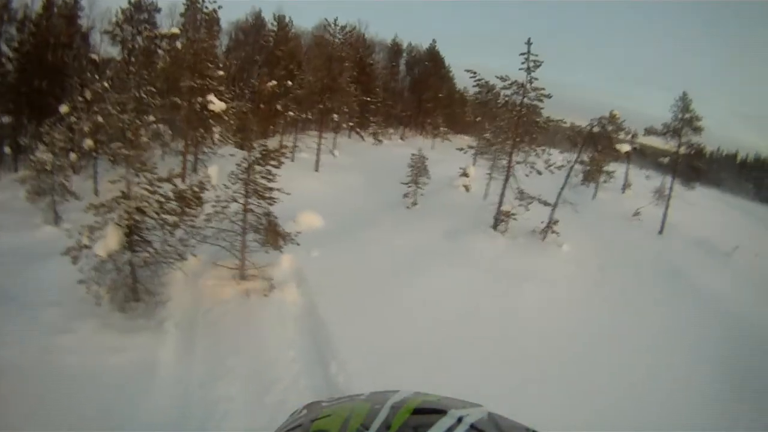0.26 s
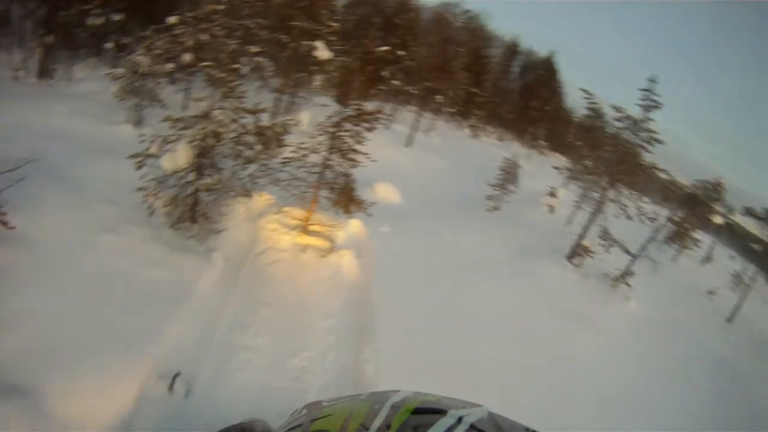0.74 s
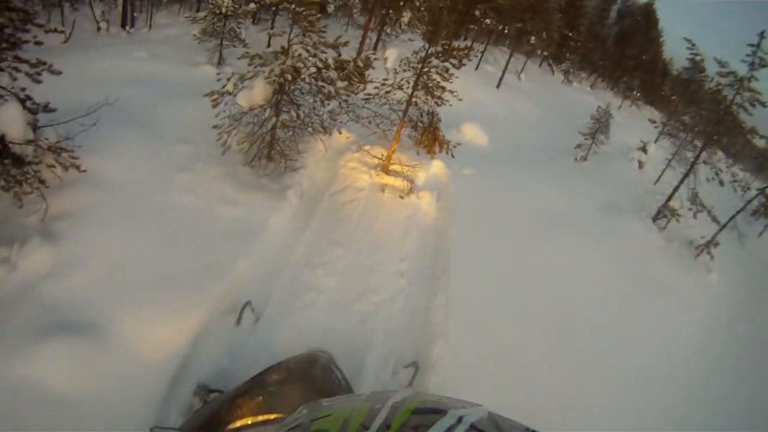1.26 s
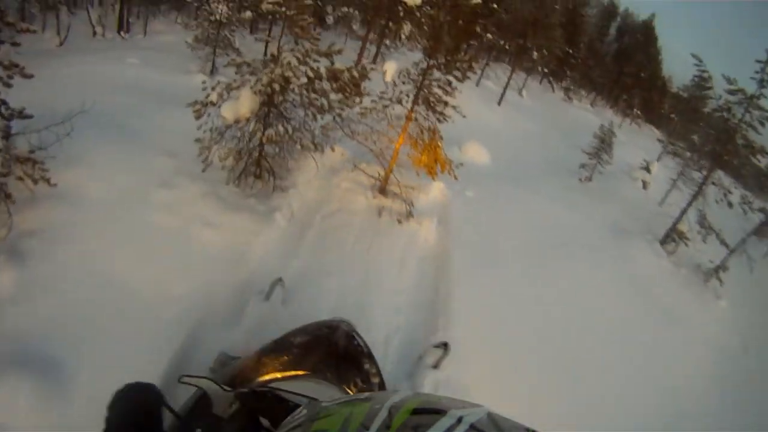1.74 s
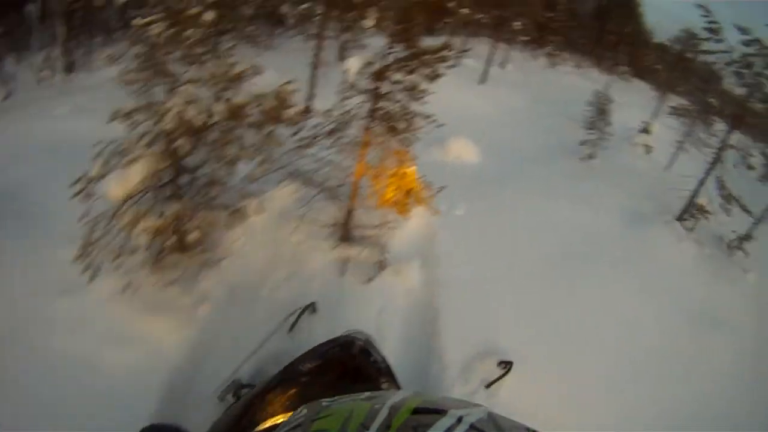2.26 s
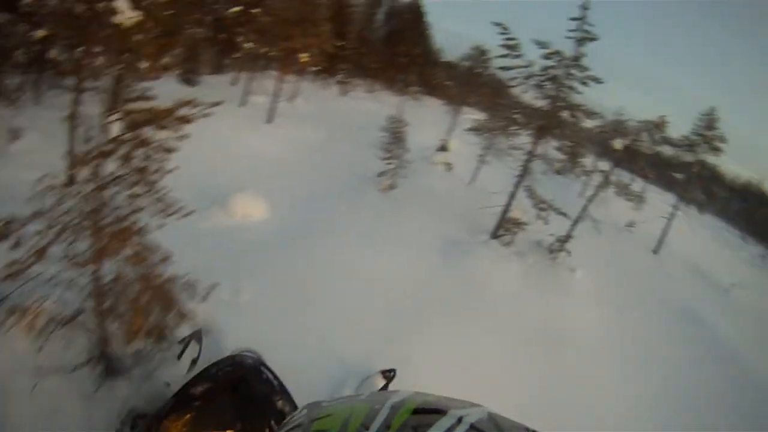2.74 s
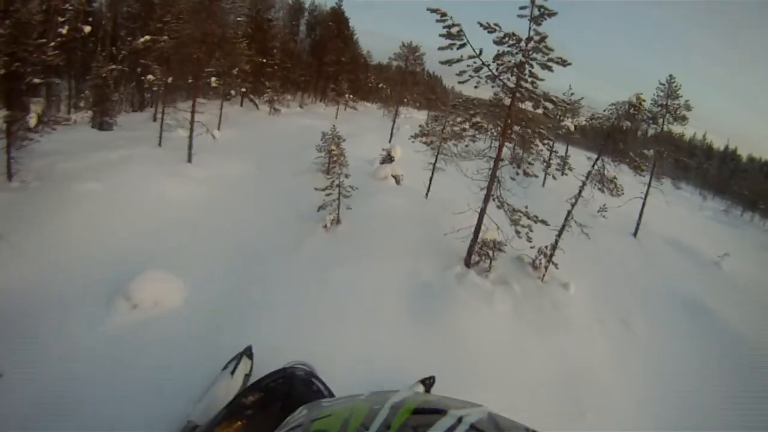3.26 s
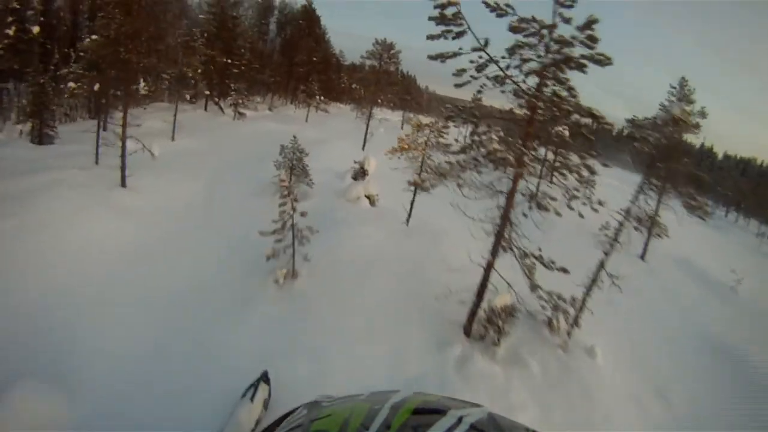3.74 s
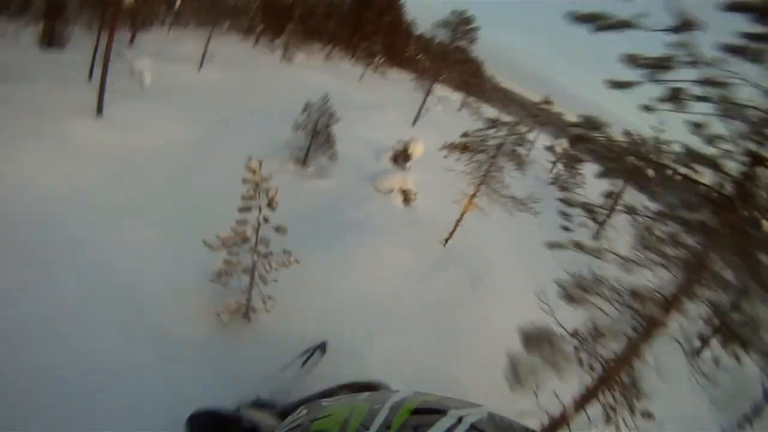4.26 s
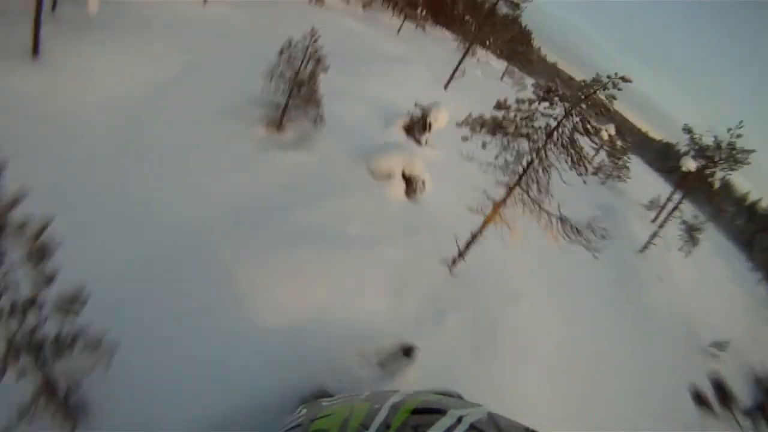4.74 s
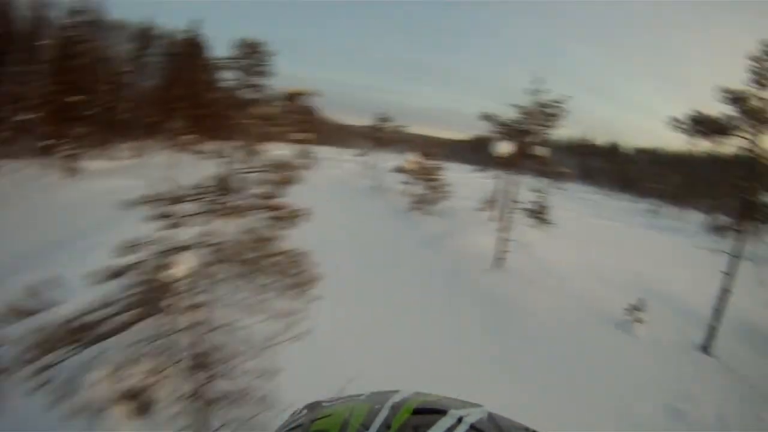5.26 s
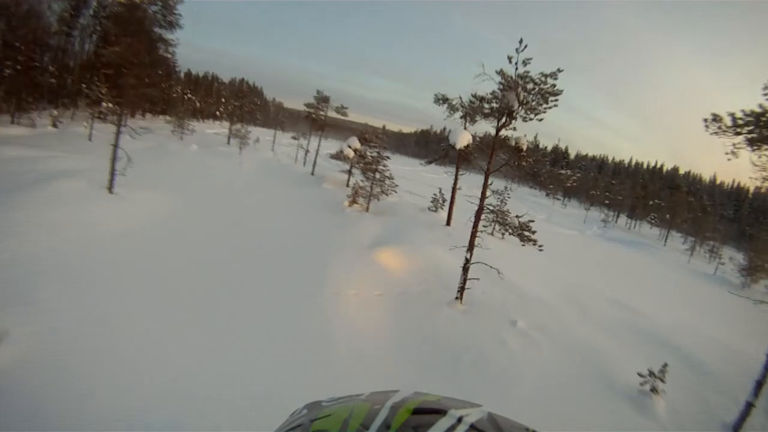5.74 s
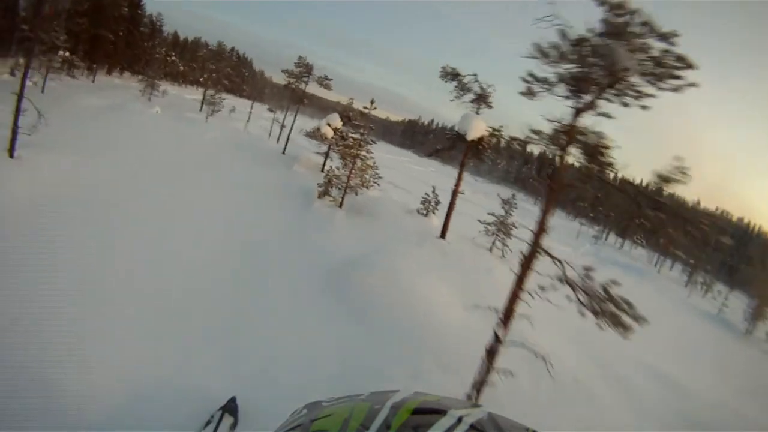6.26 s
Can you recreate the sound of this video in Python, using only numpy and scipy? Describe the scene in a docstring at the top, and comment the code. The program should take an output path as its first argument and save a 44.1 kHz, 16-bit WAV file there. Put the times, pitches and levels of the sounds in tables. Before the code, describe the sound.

A two-stroke snowmobile is heard close up from the rider's helmet, outdoors in deep snow. It begins with a low, quiet drone and a faint rattle of loose parts. Around 1 second it revs up into a clattering buzz, and a twig ticks against it. After a small dip near 2 seconds it climbs again, with a brief metallic buzz, reaching its highest, snarling whine from about 2.7 to 3.8 seconds while the track hums underneath. The revs fall away by 4.3 seconds. At about 4.55 seconds a branch briefly scrapes the helmet, then gives one sharp knock near 4.7 seconds, the loudest moment, followed by a few light ticks. The engine rises and falls in short throttle bursts until the end at 6.5 seconds. A faint low rumble lies beneath it, and a thin, high sizzle rides on top.

```python
"""A snowmobile's two-cylinder, two-stroke engine drones low, then revs up and down through deep snow.
Exhaust, clatter and whine follow the turning crank. Loose parts rattle, and the track hums at speed.
Twigs tick as the sled weaves between young pines; one branch scrapes the helmet, then knocks sharply.
All is heard from a small camera on the rider's helmet, which holds down the peaks and samples
coarsely, mirroring the middle pitches into a thin, high sizzle."""
import sys
import numpy as np
from scipy import signal
from scipy.fft import rfft, irfft, next_fast_len
from scipy.io import wavfile
from scipy.ndimage import uniform_filter1d

SR = 44100
rng = np.random.default_rng(int(sys.argv[2]) if len(sys.argv) > 2 else 0)


def log_audio(samples):
    """Write samples as a 16-bit WAV file to the path given in sys.argv[1]."""
    # one column per channel
    frames = np.atleast_2d(samples).T
    # limit to full scale, then quantise
    limited = np.clip(frames, -1, 1)
    pcm = np.round(limited * 32767).astype(np.int16)
    wavfile.write(sys.argv[1], SR, pcm)


N = 287091
TIME = np.arange(N) / SR
FFT_SIZE = next_fast_len(N + SR // 4, True) // 2 * 2
FREQUENCIES = np.maximum(np.arange(FFT_SIZE // 2 + 1) * SR / FFT_SIZE, 1)
CRUISE_HZ = 150  # firings per second at cruising speed

# engine speed (time [s], firing rate [Hz])
ENGINE_SPEED = [(0.0, 56.2), (0.309, 62.2), (0.502, 68.9), (0.924, 91.1), (1.155, 143.7), (1.316, 129.9),
                (1.457, 141.8), (1.918, 141.3), (2.181, 121.0), (2.338, 150.6), (2.543, 163.6),
                (2.728, 191.4), (2.881, 190.9), (3.099, 214.1), (3.22, 196.7), (3.426, 210.8),
                (3.555, 192.6), (3.756, 192.3), (3.994, 148.2), (4.144, 127.9), (4.333, 118.8),
                (4.546, 131.7), (4.736, 133.4), (4.922, 157.6), (5.179, 146.9), (5.35, 164.9),
                (5.546, 134.7), (5.826, 168.7), (6.004, 142.2), (6.111, 154.0), (6.26, 133.0),
                (6.51, 152.0)]
# squeezes of the throttle (start [s], length [s], opening [0-1], extra clatter and whine [dB])
SQUEEZES = [(0.873, 0.21, 0.65, 1), (1.424, 0.54, 0.15, -1), (2.197, 0.51, 0.98, 2),
            (2.887, 0.19, 0.3, 0.5), (3.232, 0.22, 0.24, 1), (3.55, 0.27, 0.12, 0.5),
            (4.233, 0.47, 0.35, 1.5), (4.786, .16, .9, 2.5), (5.16, 0.14, 1, 0), (5.56, 0.24, 0.72, 1),
            (5.988, 0.086, 0.8, -.5), (6.325, .18, 0.53, -0.5)]
# how each engine sound follows speed and throttle, and swells at one resonant speed
# (base level at cruise [dB], rise per doubling of speed [dB], change at full throttle [dB],
# resonant firing rate [Hz], width [Hz], swell [dB])
NOTE_LEVEL = (-47.5, 9.5, 5, 187.5, 29, 9)
OVERTONE_LEVEL = (-54.5, 11, 10, 128, 24, 2)
CLATTER_LEVEL = (-35, 14.5, 1, 162, 10, 2.5)
HISS_LEVEL = (-42.5, 15, 0, 164, 1, 2.5)
SNARL_LEVEL = (-49, 11.5, -2, 203, 17, 11)
# exhaust tones around the main note (pitch [x firing rate], level [dB])
EXHAUST_TONES = [(.5, -22), (1.5, -5.5), (2, 3), (2.5, -6), (3, 3), (3.5, -4), (4, -0.5), (4.5, 0)]
# pitches the exhaust pipe favours (frequency [Hz], gain [dB])
PIPE_COLOUR = [(60, 3), (200, -9.5), (260, -3), (315, 5), (370, 0), (420, -3.5), (500, -2.5), (650, -6.5),
               (750, 3.5), (950, -25)]
# broad tone colour of the hood (frequency [Hz], gain [dB])
HOOD_COLOUR = [(50, -67), (130, -15), (450, -19), (680, -25), (820, -21), (1060, -2.5), (1150, -5.5),
               (1400, 1.5), (1560, 1), (1850, -11), (2300, -7), (3100, -8), (3700, -16), (5000, -18.5),
               (5800, -28.5)]
# peaks and dips of the hood's ringing panels (frequency [Hz], width [Hz], gain [dB])
HOOD_PANELS = [(733, 6.3, 11), (888, 247, 9.5), (1077.4, 96, -17), (1178, 38, 9.5), (1305, 30, 3.5),
               (1400, 71, -13.5), (1689, 72, 10.5), (1969, 206, 14), (2342, 20, 9), (2515, 94, 11.5),
               (2517, 43, -11), (2680, 15.5, 7.5), (3175, 50, -0.5), (3020, 48, 7), (3600, 77, -11),
               (3517, 210, 8)]
# tones that stand out of the clatter (pitch [x firing rate], level [dB])
WHINE_TONES = [(6, -4.5), (6.5, -10), (7, -8), (8, -7.5), (8.5, -18.5), (10.5, -9.5), (12, -5), (14, -12),
               (15, -19), (16, -1)]
# the whine carries best at middle pitches (frequency [Hz], gain [dB])
WHINE_COLOUR = [(700, -11), (1020, -12), (1125, 8), (1250, 0.5), (1500, -0.5), (1680, -9), (1980, 0.5),
                (2200, -9), (2480, -1.5), (3000, -9)]
# how clearly the engine whines (time [s], gain relative to the clatter [dB])
WHINE_CLARITY = [(0, -2), (1.33, -21), (1.5, -2.5), (1.87, 3), (2.0, -14), (2.22, 0), (2.45, -5.5),
                 (2.92, -1.5), (3.65, -4), (3.95, -14), (4.9, -11), (5.33, 0.5), (5.55, -8.5), (5.85, -2),
                 (6.05, -12), (6.51, -12)]
# the track hums on the fast stretch (start [s], length [s], level [dB])
TRACK_HUM = (2.65, 1.11, -47.5)
# tone colour of the rumble over snow (frequency [Hz], gain [dB])
RUMBLE_COLOUR = [(20, -7.5), (45, -13), (64, 1.5), (85, -4), (120, -9.5), (185, -0.5), (260, -12.5),
                 (500, -10.5), (1000, -30)]
# loudness of that rumble (time [s], level [dB])
RUMBLE_LEVEL = [(0, -60.5), (1.2, -54), (2.5, -51), (3.3, -54.5), (4.2, -51.5), (6.51, -52.5)]
# a branch drags over the helmet (start [s], length [s], level [dB])
BRANCH_SCRAPE = (4.548, 0.076, -20)
# hard knocks of the branch (time [s], level [dB], time to fade 60 dB [s])
BRANCH_KNOCKS = [(4.557, -20, 0.018), (4.569, -14, 0.033), (4.640, -8.5, 0.032), (4.652, -19.5, 0.084),
                 (4.6668, 2.5, 0.028), (4.670, -5, 0.034)]
# tone colour of the branch on the helmet (frequency [Hz], gain [dB])
BRANCH_COLOUR = [(150, -27), (400, -39), (540, 1.5), (850, -25), (1150, -8), (1400, 0.5), (1700, 6.5),
                 (2100, 5), (2800, 1.5), (3500, -6.5), (4200, -6), (5000, -17.5), (5900, -22)]
# twigs and snow crust hit the sled (time [s], level [dB], time to fade 60 dB [s], brightness [dB])
TWIG_TICKS = [(0.14, -43, 0.12, -20), (.3065, -32.5, 0.013, -24), (0.523, -37, 0.058, -7),
              (0.73, -34, 0.027, -18), (1.184, -29, 0.063, 3.5), (4.722, -28, 0.033, -13),
              (4.787, -28, 0.015, -10), (4.845, -29, 0.011, 1), (5.007, -43.5, .03, 9)]
# dull ring of a tick in the hood (frequency [Hz], gain [dB])
TICK_COLOUR = [(500, -32), (1200, -34), (1500, -2), (1700, 6), (1950, -4), (2550, 1.5), (3100, -6),
               (3700, -5), (5900, -76)]
# bright ring of the metal runners (frequency [Hz], gain [dB])
RUNNER_COLOUR = [(1000, -79), (2600, 10), (3400, 5.5), (4200, -13), (4700, 0), (5000, 10), (5400, -10),
                 (5900, -11)]
# jolts of the helmet (time [s], level [dB])
HELMET_JOLTS = [(0.039, -37), (.515, -38.5), (0.547, -46), (1.193, -35), (1.288, -38), (2.111, -36.5),
                (2.76, -37), (4.57, -19), (4.646, -12.5), (4.991, -35)]
# ringing of the helmet and camera mount (frequency [Hz], level [dB], time to fade 60 dB [s])
HELMET_RINGS = [(61.3, -6, 0.5), (176.2, -10, 0.3), (501, -8, 0.1)]
# the frame shakes as the sled pulls away (start [s], length [s], level [dB])
FRAME_SHAKE = (0.14, 0.96, -49)
# a metal part buzzes briefly, three times (start [s], length [s], level [dB])
METAL_BUZZES = [(0.402, 0.22, -54), (1.99, 0.099, -45), (2.331, 0.17, -34)]


def engine(firing_hz, throttle, strain_db, wobble=0.001415, split_hz=2450, air_hz=3600):
    """The crank drives exhaust, clatter and whine; the clatter gets brighter with speed."""
    turns = np.cumsum(firing_hz * (1 + wobble * drift(22))) / SR  # counts the firings
    clatter_db = level_db(CLATTER_LEVEL, firing_hz, throttle)
    hiss_db = level_db(HISS_LEVEL, firing_hz, throttle)
    rattle = clatter(turns)
    lows, under_air = below(rattle, split_hz), below(rattle, air_hz)
    air = (rattle - under_air) * from_db(3.2 + 4 * np.log2(firing_hz / CRUISE_HZ))  # the very top
    hiss = under_air - lows + air
    rattle = from_db(clatter_db) * unit_power(lows) + from_db(hiss_db) * unit_power(hiss)
    song = from_db(clatter_db + over_time(WHINE_CLARITY)) * whine(turns, firing_hz)
    return exhaust(turns, firing_hz, throttle) + from_db(strain_db) * (rattle + song)


def crank(flywheel_s=0.07):
    """Firing rate, throttle and the extra noise of strain; the flywheel smooths changes of speed."""
    firing_hz = uniform_filter1d(over_time(ENGINE_SPEED), int(flywheel_s * SR), mode="nearest")
    throttle, strain_db = 0, 0
    for start, length, opening, db in SQUEEZES:
        squeeze = swell(start, length, attack_s=0.033, release_s=0.053)
        throttle += opening * squeeze
        strain_db += db * squeeze
    return firing_hz, np.clip(throttle, 0, 1), strain_db


def exhaust(turns, firing_hz, throttle, waver_db=0.06, rough_db=2):
    """Firings make a note, and the pipe colours its overtones; unequal cylinders add tones between."""
    note_db = level_db(NOTE_LEVEL, firing_hz, throttle)
    overtone_db = level_db(OVERTONE_LEVEL, firing_hz, throttle)
    note = tone(turns, 1) * from_db(note_db + waver_db * drift(19))
    overtones, power = 0, 0
    for multiple, db in EXHAUST_TONES:
        gain = from_db(db + at_hz(PIPE_COLOUR, multiple * firing_hz))
        overtones += tone(turns, multiple) * gain * from_db(rough_db * drift(5.3))
        power += gain ** 2
    return np.sqrt(2) * (note + from_db(overtone_db) * overtones / np.sqrt(power))


def clatter(turns, rough=0.52, fade_db=0.09, throb=0.11, limp=0.12, flutter_db=0.5, grain_db=0.5):
    """Wavering crank tones and a rush of noise at each firing make the hood ring."""
    hood = response(HOOD_COLOUR, HOOD_PANELS)
    tones = np.zeros(N)
    for harmonic in range(9, 48):  # the crank goes round once every two firings
        tones += tone(turns, harmonic / 2) * (1 + rough * drift(6)) * from_db(-fade_db * harmonic)
    beat = 1 + throb * np.cos(2 * np.pi * turns) + limp * np.cos(np.pi * turns)
    rush = rng.standard_normal(N) * beat * from_db(grain_db * drift(120))
    sound = unit_power(through(tones, hood)) + unit_power(through(rush, hood))
    return unit_power(sound) * from_db(flutter_db * drift(68))


def whine(turns, firing_hz, waver_db=3):
    """Clean crank tones swell as they slide across the pitches where the hood rings."""
    hood = response(HOOD_COLOUR, HOOD_PANELS) + response(WHINE_COLOUR)
    tones = 0
    for multiple, db in WHINE_TONES:
        swell_db = np.interp(multiple * firing_hz, FREQUENCIES, hood)
        tones += tone(turns, multiple) * from_db(db + swell_db + waver_db * drift(6.7))
    return np.sqrt(2) * tones


def panel_snarl(firing_hz, throttle, pitch_hz=1715, width_hz=130):
    """Near top speed the shaking sets one hood panel ringing hard."""
    panel = unit_power(ring(rng.standard_normal(N), pitch_hz, fade_time(width_hz)))
    snarl = unit_power(through(panel, response(HOOD_COLOUR)))
    return from_db(level_db(SNARL_LEVEL, firing_hz, throttle)) * snarl


def track(firing_hz, slip=0.03, rib_ratio=0.651, wheel_ratio=0.511, wheel_db=-16, rough_db=2):
    """The track's ribs and drive wheels hum in loose step with the engine; the sled rumbles on snow."""
    turns = np.cumsum(firing_hz * (1 + slip * drift(4))) / SR
    hum = unit_power(tone(turns, rib_ratio) + from_db(wheel_db) * tone(turns, wheel_ratio))
    hum *= from_db(rough_db * drift(10)) * envelope(TRACK_HUM, attack_s=0.12, release_s=0.3)
    rumble = through(rng.standard_normal(N), response(RUMBLE_COLOUR))
    return hum + from_db(over_time(RUMBLE_LEVEL)) * rumble


def branches():
    """A branch drags across the helmet and knocks on it; twigs tick on the hood and runners."""
    drag = rng.standard_normal(N) * envelope(BRANCH_SCRAPE, attack_s=0.012, release_s=0.02)
    dull = crunches([(s, db, fade_s) for s, db, fade_s, _ in TWIG_TICKS])
    bright = crunches([(s, db + bright_db, fade_s) for s, db, fade_s, bright_db in TWIG_TICKS])
    on_helmet = through(drag + crunches(BRANCH_KNOCKS), response(BRANCH_COLOUR))
    on_hood = through(dull, response(TICK_COLOUR, HOOD_PANELS))
    return on_helmet + on_hood + through(bright, response(RUNNER_COLOUR))


def helmet(soft_hz=350):
    """Soft jolts set the helmet and its camera mount ringing."""
    pushes = np.zeros(N) + 1e-18
    for s, db in HELMET_JOLTS:
        pushes[int(s * SR)] = from_db(db)
    pushes = lowpass(pushes, soft_hz, order=2)
    return sum(from_db(db) * ring(pushes, hz, fade_s) for hz, db, fade_s in HELMET_RINGS)


def frame_shake(grain_db=4, clink_spread_db=4, runner_db=-13):
    """Pulling away shakes the hood and sets the metal runners clinking."""
    shaking = rng.standard_normal(N) * from_db(grain_db * drift(60))
    clinks = rng.standard_normal(N) * from_db(clink_spread_db * drift(55))
    hood = unit_power(through(shaking, response(HOOD_COLOUR, HOOD_PANELS)))
    runners = unit_power(through(clinks, response(RUNNER_COLOUR)))
    return envelope(FRAME_SHAKE, attack_s=0.25, release_s=0.42) * (hood + from_db(runner_db) * runners)


def loose_part(start_s=0.141, first_gap_s=0.035, shrink=0.89, fade_s=0.06, crunch_db=-44, ping_db=-41):
    """A loose part bounces on the hood six times, ever faster; each touch is a crunch and a ping."""
    gaps = first_gap_s * shrink ** np.arange(5)
    times = start_s + np.r_[0, np.cumsum(gaps)]
    crunch = crunches([(s, crunch_db, fade_s) for s in times])
    touches = np.zeros(N) + 1e-18
    touches[(times * SR).astype(int)] = from_db(ping_db)
    ping = ring(lowpass(touches, hz=2500, order=4), hz=1700, fade_s=fade_s)
    return through(crunch, response(TICK_COLOUR, HOOD_PANELS)) + ping


def metal_buzz(pitch_hz=3075, width_hz=60, chatter_db=2, taps_per_s=700):
    """Quick, uneven taps keep a metal part ringing at one pitch."""
    taps = (rng.random(N) < taps_per_s / SR) * rng.standard_normal(N)
    taps *= from_db(chatter_db * drift(40))
    gain = sum(envelope(event, attack_s=0.07, release_s=0.15) for event in METAL_BUZZES)
    return gain * unit_power(ring(taps, pitch_hz, fade_time(width_hz)))


def level_db(settings, firing_hz, throttle):
    """Level of one engine sound at this speed and throttle."""
    cruise_db, octave_db, throttle_db, resonant_hz, width_hz, swell_db = settings
    speed_db = octave_db * np.log2(firing_hz / CRUISE_HZ)
    resonance_db = swell_db * bell(firing_hz, resonant_hz, width_hz)
    return cruise_db + speed_db + throttle_db * throttle + resonance_db


def tone(turns, multiple):
    """A pure tone at a multiple of the turning rate, starting anywhere in its cycle."""
    return np.sin(2 * np.pi * (multiple * turns + rng.random()))


def crunches(contacts):
    """Each contact is a short burst of noise that dies away."""
    gain = np.zeros(N)
    for s, db, fade_s in contacts:
        age = TIME[:int(2 * fade_s * SR)]
        start = int(s * SR)
        gain[start:start + len(age)] += from_db(db - 60 * age / fade_s)
    return gain * rng.standard_normal(N)


def ring(pushes, hz, fade_s):
    """Each push starts a tone that falls by 60 dB in fade_s."""
    decay, angle = from_db(-60 / (fade_s * SR)), 2 * np.pi * hz / SR
    feedback = decay * np.cos(angle)
    return signal.lfilter([1, -feedback], [1, -2 * feedback, decay * decay], pushes + 1e-18)


def fade_time(width_hz):
    """Seconds for a resonance this wide to fade by 60 dB."""
    return np.log(1000) / (np.pi * width_hz)


def swell(start, length, attack_s, release_s):
    """Rises to 1, holds to the end of its length and fades."""
    rise, fall = (TIME - start) / attack_s, 1 - (TIME - start - length) / release_s
    return np.clip(np.minimum(rise, fall), 0, 1)


def envelope(event, attack_s, release_s):
    """Gain of a held sound, from its start, length and level."""
    start, length, db = event
    return from_db(db) * swell(start, length, attack_s, release_s)


def drift(hz, step=40, warm_up=2000):
    """A random wander of typical size 1; higher hz makes it quicker."""
    memory = np.exp(-2 * np.pi * hz * step / SR)
    noise = rng.standard_normal(N // step + warm_up + 2)
    slow = signal.lfilter([1], [1, -2 * memory, memory * memory], noise)[warm_up:]
    return np.interp(np.arange(N) / step, np.arange(len(slow)), unit_power(slow))


def over_time(points):
    """A curve read at every sample."""
    return np.interp(TIME, *np.transpose(points))


def at_hz(colour, hz):
    """A tone colour read at any frequency, in dB."""
    known_hz, db = np.transpose(colour)
    return np.interp(np.log(hz), np.log(known_hz), db)


def bell(hz, centre_hz, width_hz):
    """A resonance: a hump of height 1."""
    return 1 / (1 + (2 * (hz - centre_hz) / width_hz) ** 2)


def response(colour, resonances=()):
    """A broad tone colour plus peaks and dips, in dB at every frequency."""
    peaks = sum(db * bell(FREQUENCIES, hz, width) for hz, width, db in resonances)
    return at_hz(colour, FREQUENCIES) + peaks


def through(x, response_db):
    """Colour a sound; white noise keeps its power."""
    cepstrum = irfft(np.log(unit_power(from_db(response_db))))
    cepstrum[1:FFT_SIZE // 2] *= 2  # minimum phase: ringing comes after a hit, never before
    cepstrum[FFT_SIZE // 2 + 1:] = 0
    return irfft(rfft(x, FFT_SIZE) * np.exp(rfft(cepstrum)))[:N]


def below(x, hz):
    """The part of a steady sound that lies under this frequency."""
    return irfft(rfft(x, FFT_SIZE) / (1 + (FREQUENCIES / hz) ** 10))[:N]


def lowpass(x, hz, order):
    """Soften the highs; a higher order cuts more steeply."""
    return signal.sosfilt(signal.butter(order, hz, fs=SR, output="sos"), x)


def from_db(db):
    """Decibels to gain."""
    return 10 ** (np.asarray(db) / 20)


def unit_power(x):
    """Scale to an average power of 1."""
    return x / np.sqrt(np.mean(x ** 2) + 1e-20)


def limiter(x, ceiling_db=-4.5, release_db_per_s=170, attack_s=0.0028):
    """Peaks above the ceiling turn the volume down; it comes back at a steady rate."""
    over_db = np.maximum(20 * np.log10(np.abs(x) + 1e-9) - ceiling_db, 0)
    recovery_db = release_db_per_s * TIME
    cut_db = np.maximum.accumulate(over_db + recovery_db) - recovery_db
    memory = np.exp(-1 / (attack_s * SR))
    return x * from_db(-signal.lfilter([1 - memory], [1, -memory], cut_db))


def scene():
    """Everything reaches one microphone on the helmet, in open air."""
    firing_hz, throttle, strain_db = crank()
    sled = engine(firing_hz, throttle, strain_db) + panel_snarl(firing_hz, throttle) + track(firing_hz)
    rattles = frame_shake() + loose_part() + metal_buzz()
    return (sled + rattles + branches() + helmet())[None]


def record(dry, hold_hz=12000, mirror_db=-0.5, cutoff_hz=15350):
    """The camera limits peaks; its coarse sampling steps mirror the sound around hold_hz as a sizzle."""
    sound = lowpass(limiter(dry[0]), hz=5600, order=12)
    steps = np.diff(sound, prepend=0) * 2 * np.cos(2 * np.pi * hold_hz * TIME)
    mirror = signal.lfilter([1], [1, -0.9], steps)
    flattened = np.clip(sound + from_db(mirror_db) * mirror, -1, 1)
    treble_cut = signal.ellip(10, 0.2, 70, cutoff_hz, fs=SR, output="sos")
    return signal.sosfilt(treble_cut, flattened)[None]


dry = scene()
out = record(dry)
log_audio(out)
```